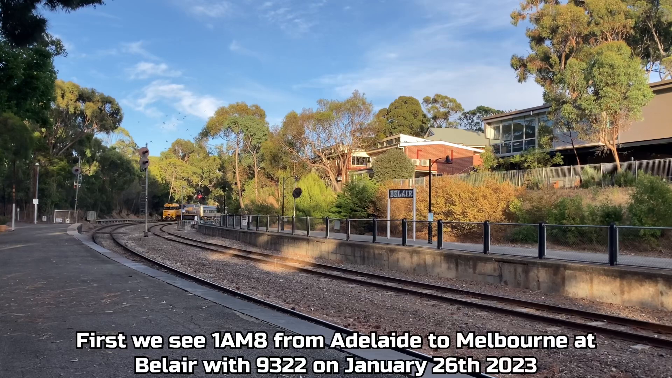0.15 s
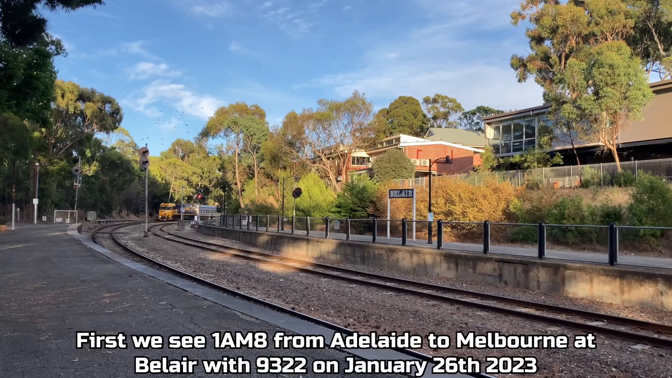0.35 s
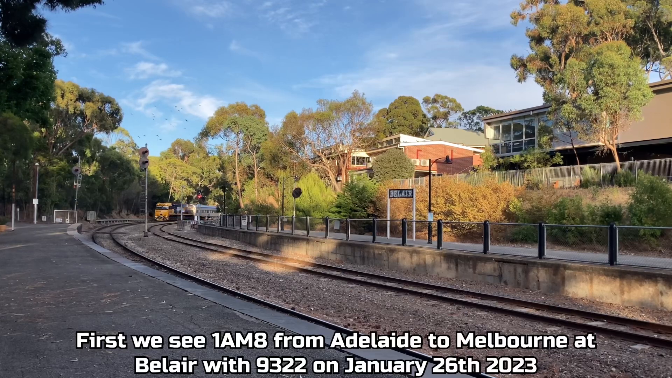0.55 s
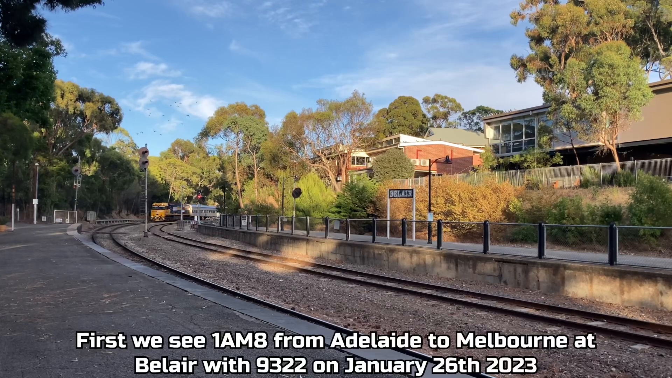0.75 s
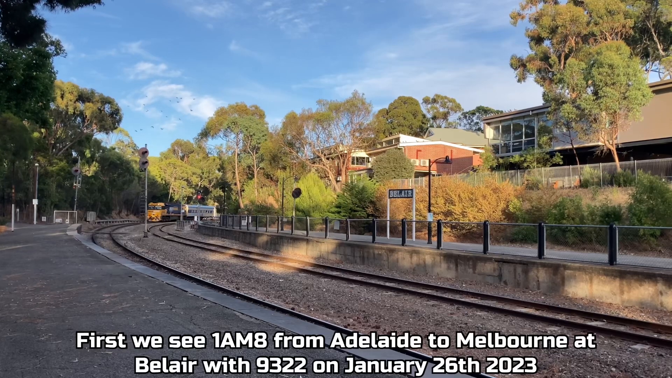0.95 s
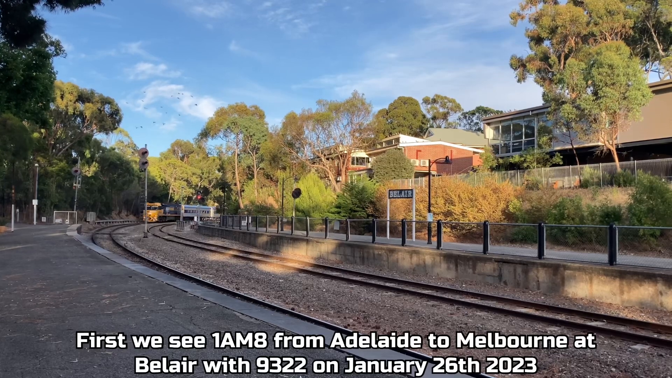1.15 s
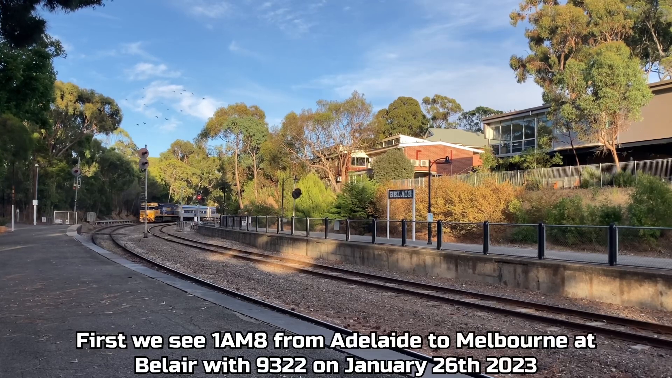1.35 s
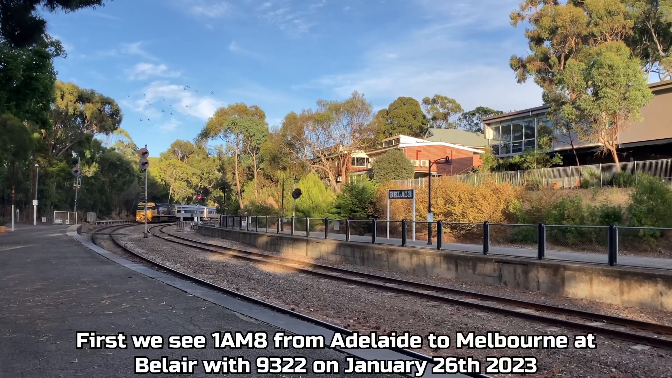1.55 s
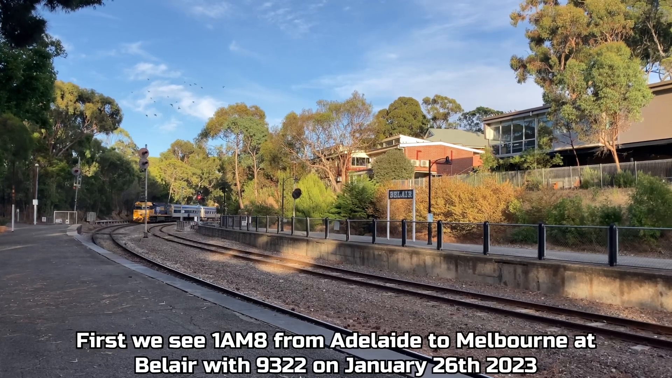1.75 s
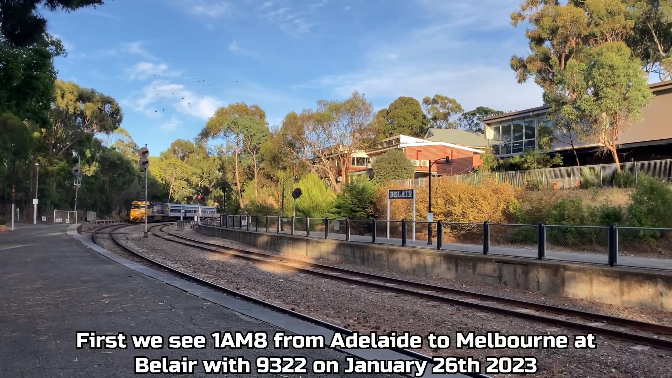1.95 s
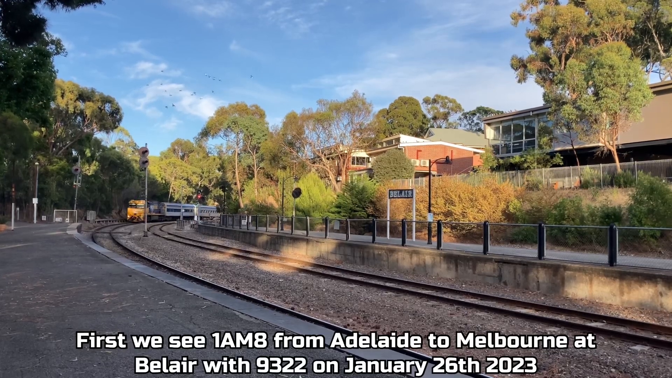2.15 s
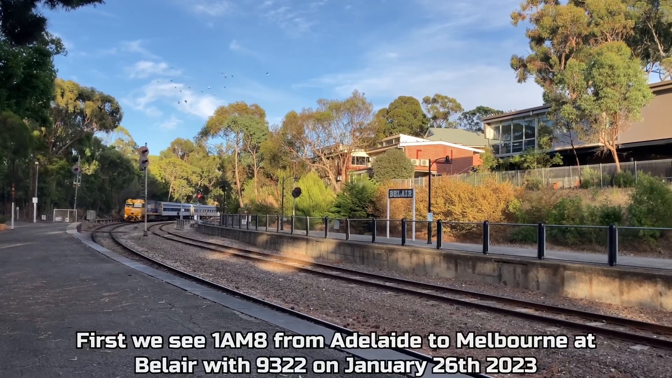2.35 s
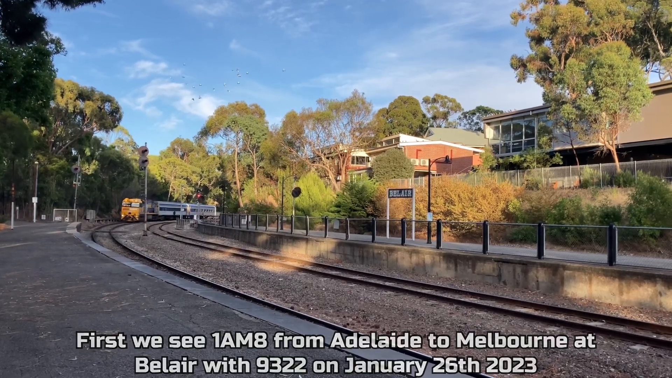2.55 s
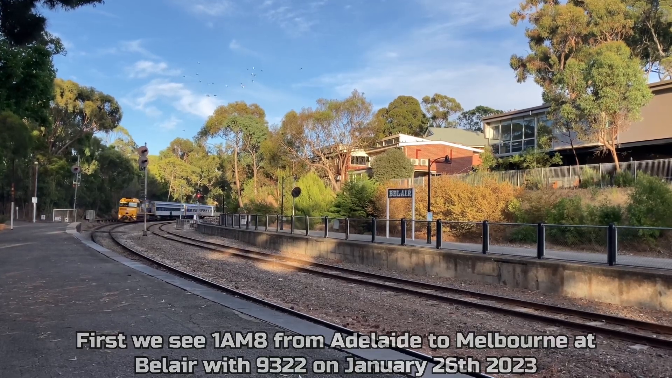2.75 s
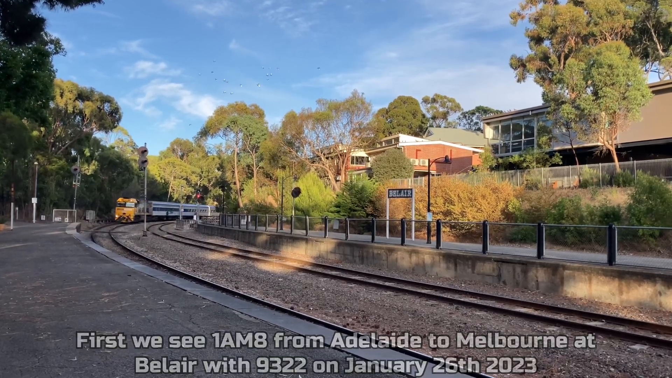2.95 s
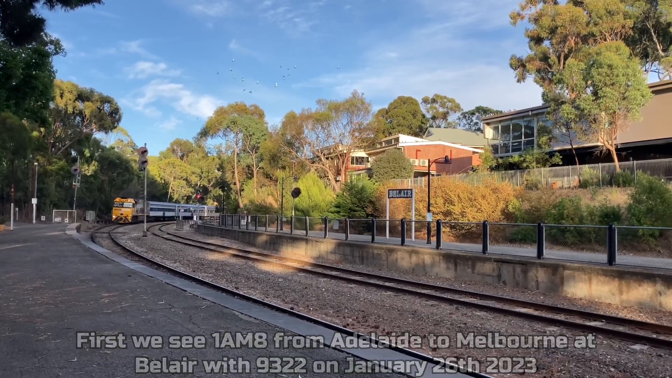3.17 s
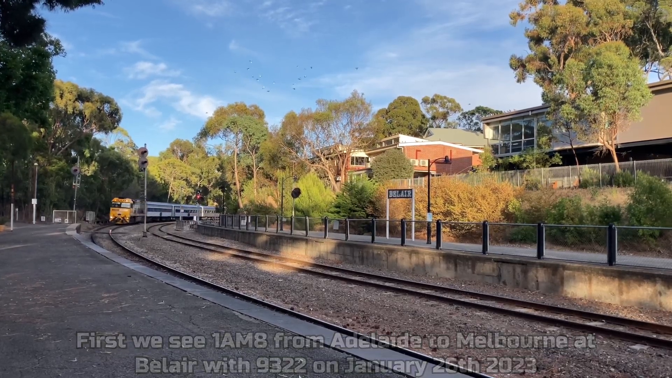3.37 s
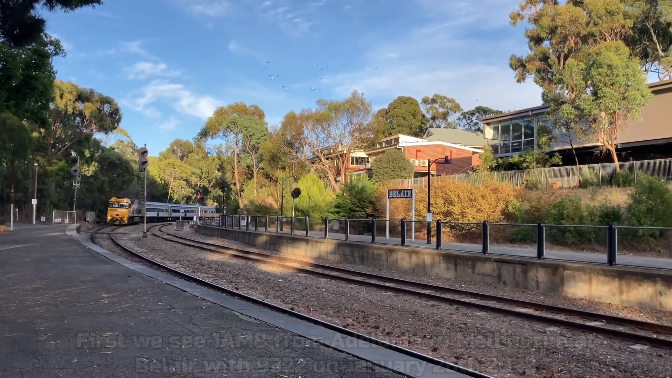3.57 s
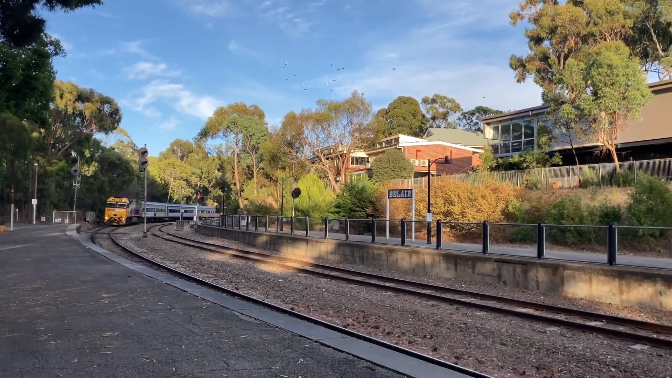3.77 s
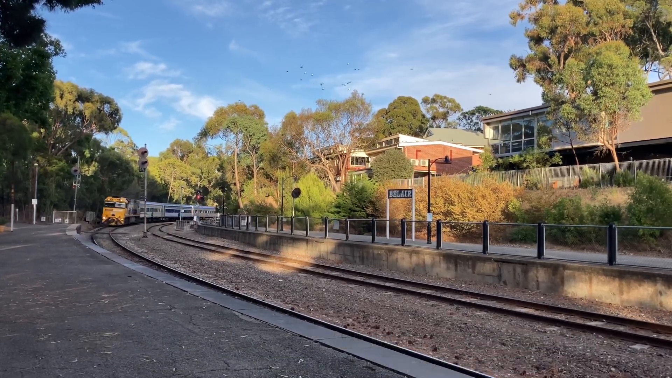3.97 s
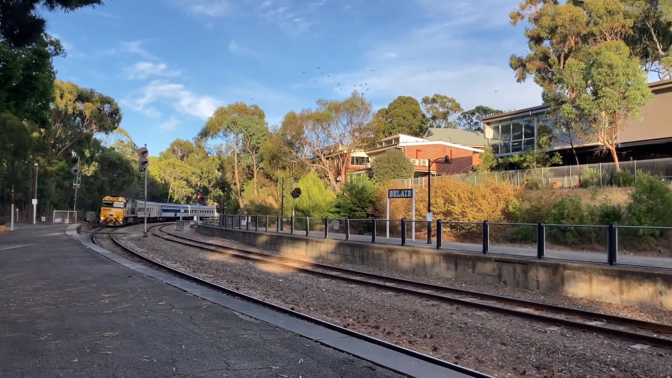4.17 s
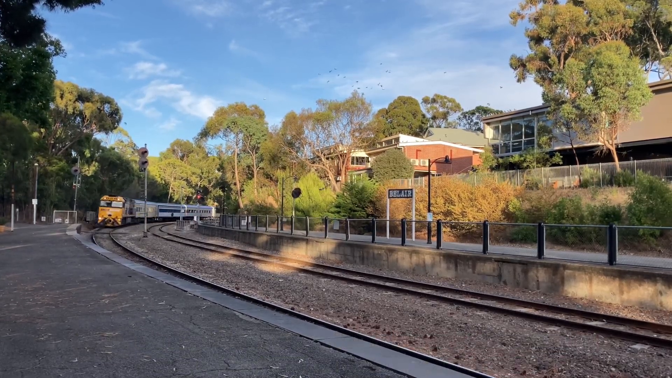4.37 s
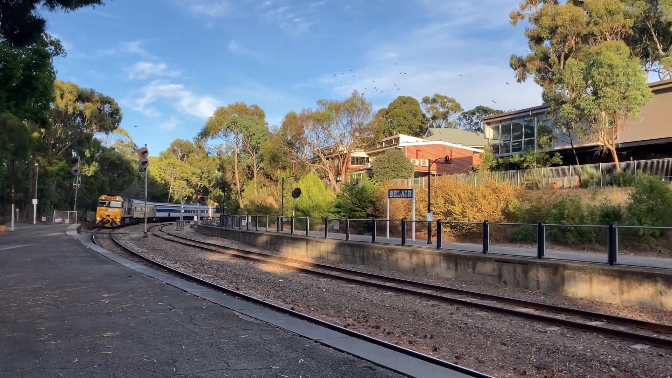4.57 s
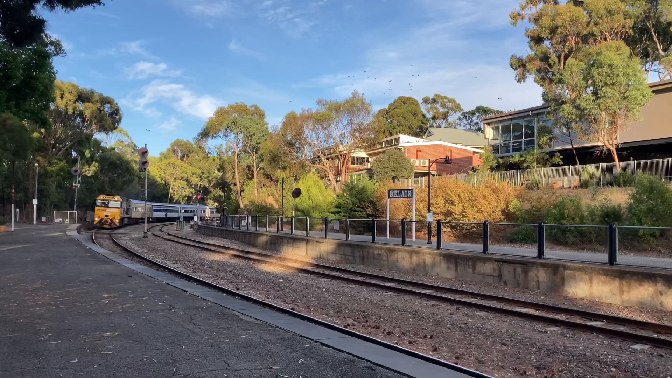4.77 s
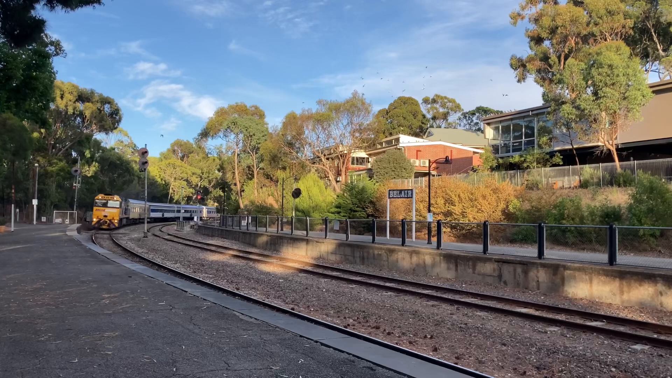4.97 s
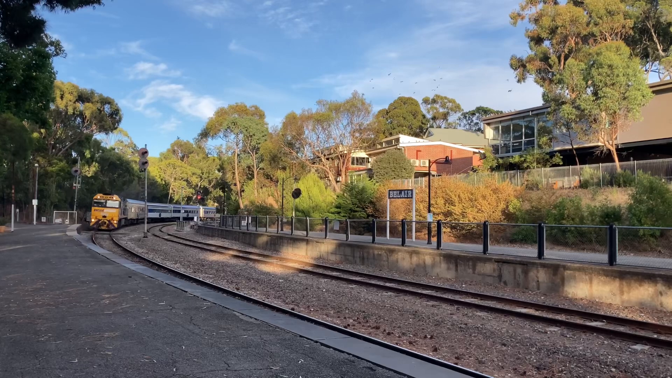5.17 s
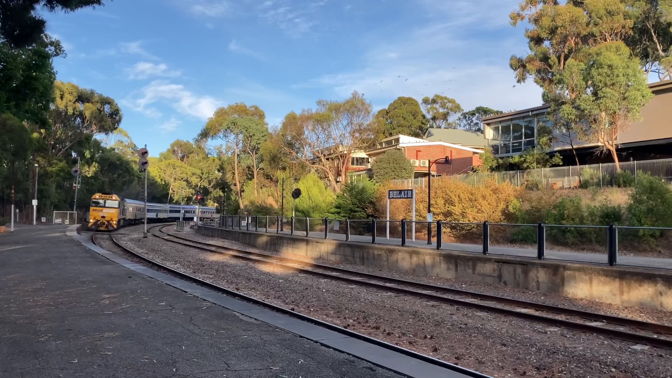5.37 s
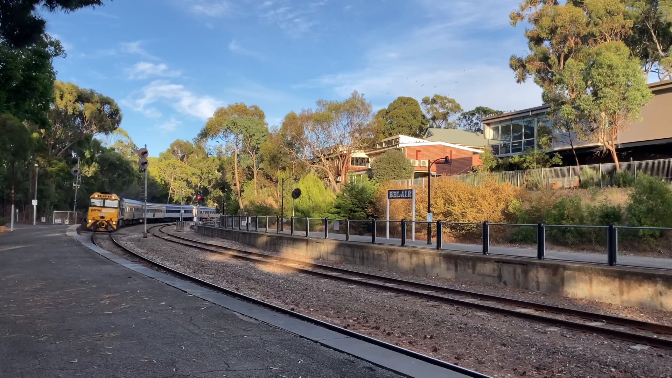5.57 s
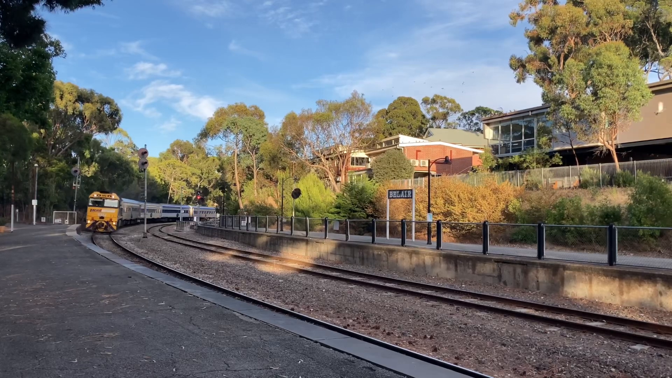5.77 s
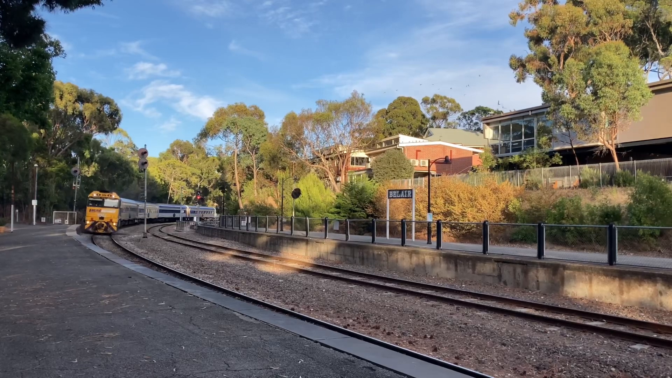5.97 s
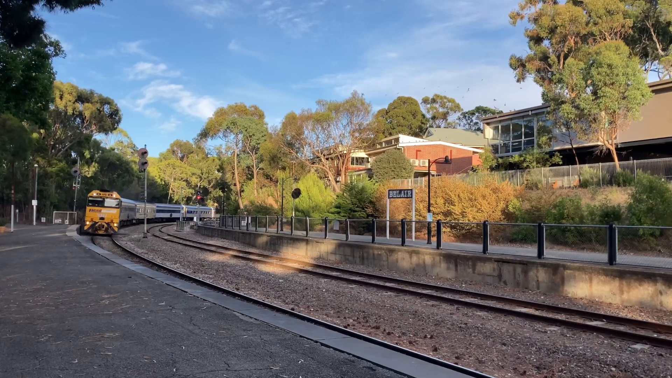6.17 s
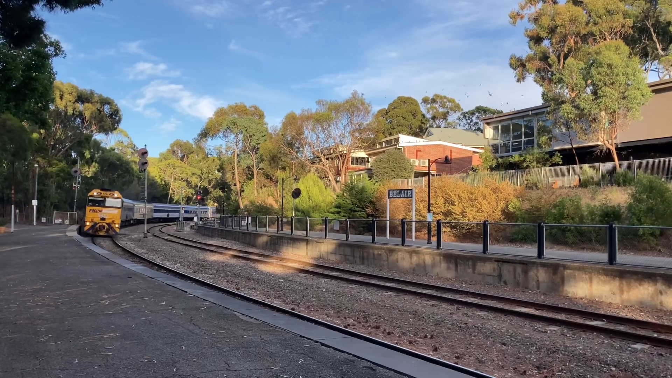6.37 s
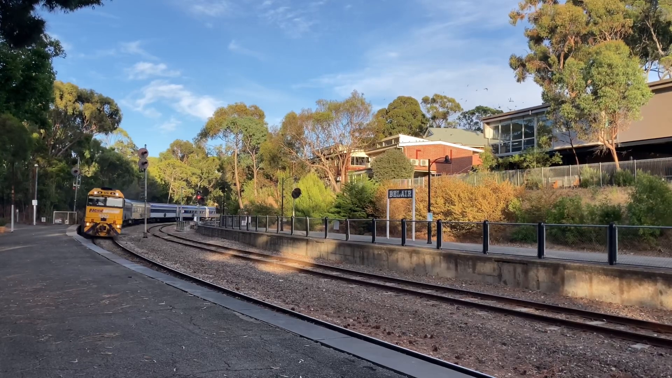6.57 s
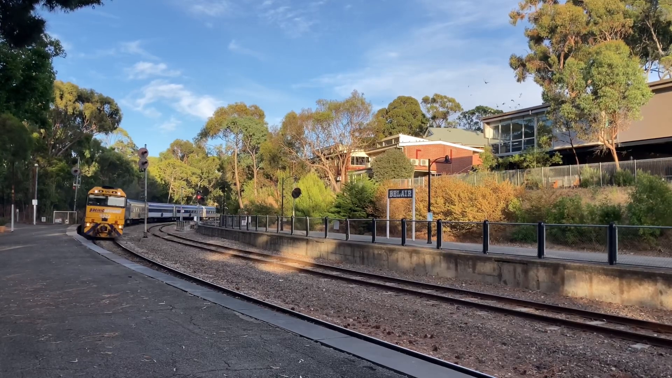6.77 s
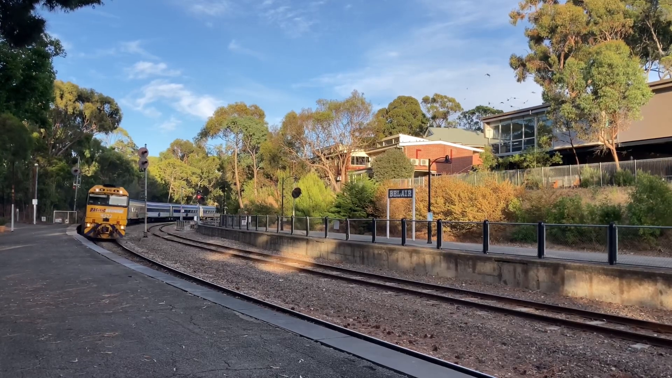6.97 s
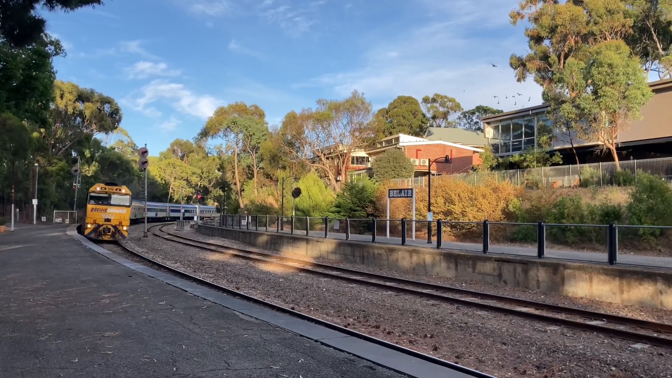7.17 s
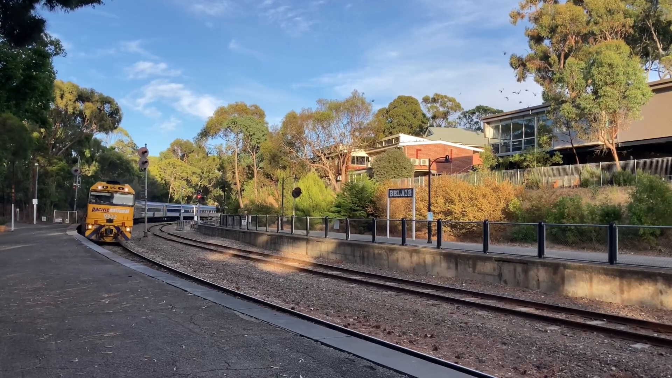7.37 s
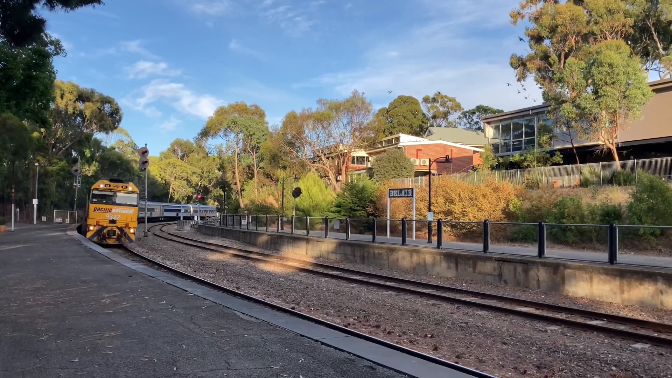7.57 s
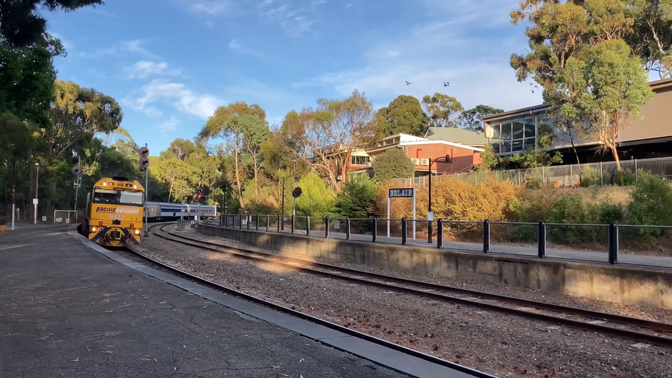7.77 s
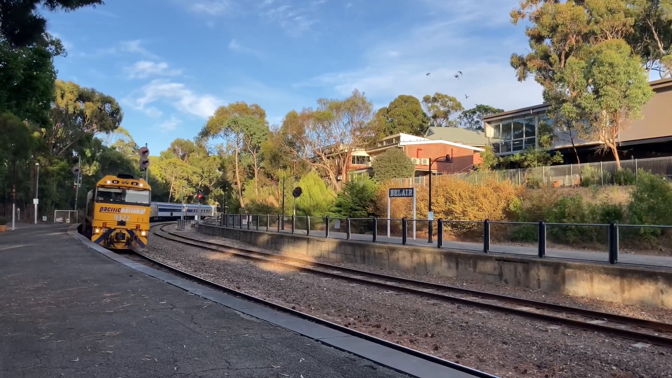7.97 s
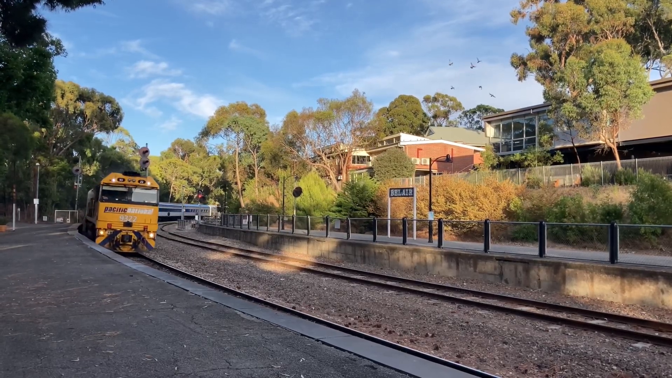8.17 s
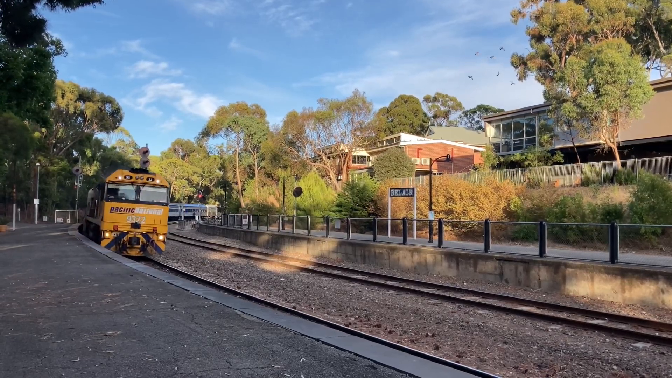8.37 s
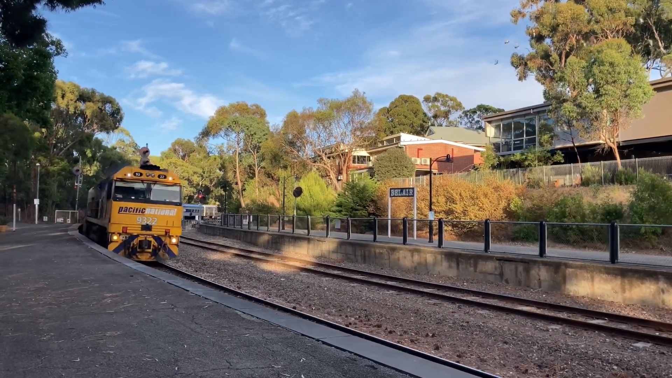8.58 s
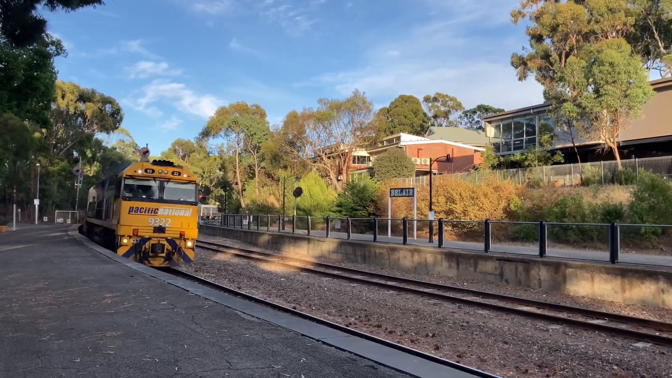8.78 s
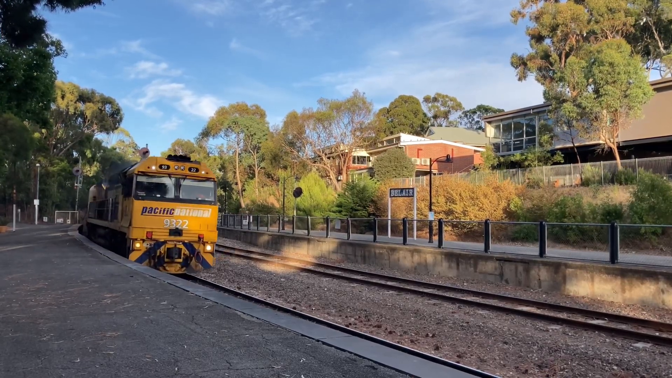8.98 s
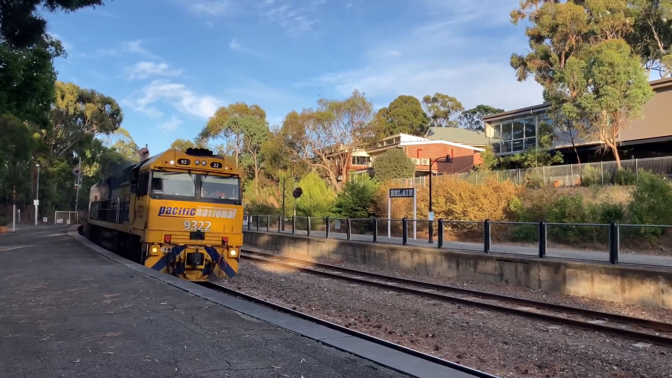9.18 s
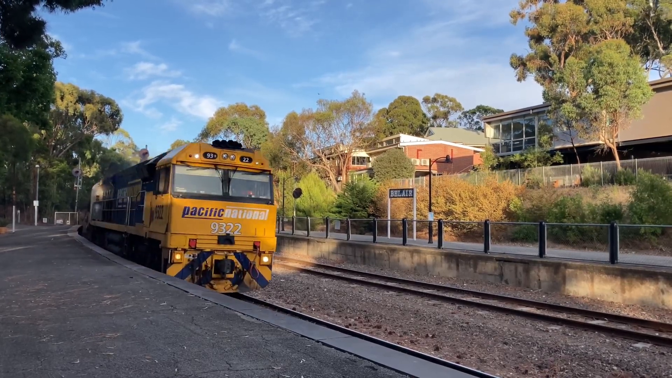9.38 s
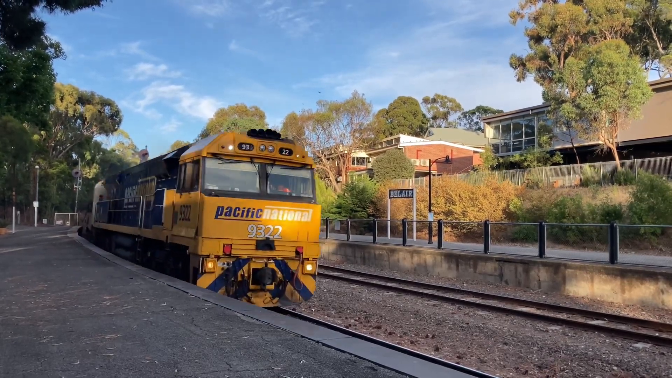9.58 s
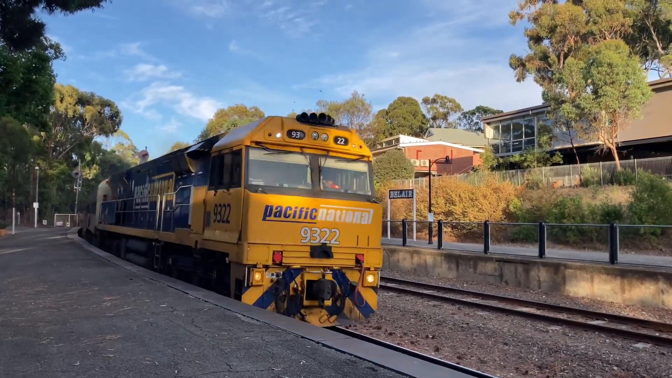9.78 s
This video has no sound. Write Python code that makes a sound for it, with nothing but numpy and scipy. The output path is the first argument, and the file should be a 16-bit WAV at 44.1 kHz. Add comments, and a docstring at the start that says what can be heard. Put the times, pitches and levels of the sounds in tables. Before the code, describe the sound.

An approaching diesel train grows from a soft rumble to a roar, flanges hissing and wheels squealing on the bend, heard from an open platform.

```python
"""A diesel locomotive draws its carriages round a curve towards a station platform.
Its exhaust throbs in noisy puffs over the steady orders of the crank, and growls wander through the rumble.
A big fan drones down in pitch as harmonics of its blade rate; the wheels rumble and roar as fluttering noise.
Flanges hiss against the curve, and squeals ring out as bands of noise and thin tones, first far off, then close by."""
import sys
import numpy as np
from scipy import signal
from scipy.fft import rfft, irfft, next_fast_len
from scipy.io import wavfile

SR = 44100
rng = np.random.default_rng(int(sys.argv[2]) if len(sys.argv) > 2 else 0)


def master(y):
    """Save y as 16-bit WAV."""
    cut = np.clip(np.atleast_2d(y).T, -1, 1)
    pcm = np.round(cut * 32767)  # scale
    wavfile.write(sys.argv[1], SR, pcm.astype(np.int16))


N = 433503
TIME = np.arange(N) / SR  # seconds
SIZE = next_fast_len(N, real=True)
BINS = np.maximum(np.fft.rfftfreq(SIZE, 1 / SR), 1)  # Hz

# Approach: a steady speed towards the point nearest the listener.
SPEED_M_PER_S, NEAREST_M, PASSES_AT_S = 15, 6, 10.54
# The locomotive comes out of the bend into the open; close by, its cab screens some of its layers.
OPEN_AT_S, OPEN_TAKES_S = 5.61, 0.12
SCREENED_AT_S, SCREENED_TAKES_S = 9.046, 0.46

# Stereo likeness of the noise washes. Each row: frequency in Hz, likeness from 0 to 1.
CHANNEL_LIKENESS = [(60, 0.97), (150, 0.96), (320, 0.91), (650, 0.56), (1100, 0.062), (1700, 0.16),
                    (2600, 0.049), (3600, 0.35), (5000, 0.12), (6200, 0.56), (6900, 1), (8000, 1),
                    (9000, 1), (10200, 1), (11400, 0.87), (12600, .75), (13600, 0.94)]
# Stereo tilt of the microphones. Each row: frequency in Hz, left minus right in dB.
CHANNEL_TILT = [(50, -3), (130, -2), (300, .2), (1200, 2), (2600, 2), (5000, 0.5), (7000, -0.5)]
# Stereo phase of the microphones. Each row: frequency in Hz, lead of the left channel in radians.
CHANNEL_LEAD = [(0, 0), (500, .65), (900, .9), (1400, 1.1), (1650, 4), (2450, 6.3), (3600, 9.4),
                (4750, 12.6), (5500, 15), (6100, 13.5), (7000, 12.6), (9050, 9.4), (11400, 6.3),
                (13400, 3.1), (14300, 2.6), (15500, 0)]
CUTOFF_HZ = 15800

# Brief flange squeaks. Each row: peak in seconds, length in seconds, mode in Hz, width in Hz,
# level in dB before the squeaks' common gain.
FLANGE_SQUEAKS = [(1.5, .16, 3580, 80, -61), (2.248, 0.27, 3160, 90, -55), (6.09, 0.13, 1980, 110, -48.5),
                  (6.13, .09, 2525, 60, -48.5), (6.64, 0.092, 3250, 1100, -41.5),
                  (7.75, 0.064, 1900, 110, -40), (6.97, 0.091, 7720, 140, -41.5),
                  (7.17, 0.18, 3080, 170, -47), (7.17, 0.19, 3900, 260, -43.5),
                  (7.264, 0.078, 3900, 170, -42), (7.62, 0.093, 7830, 69.9, -42),
                  (9.45, 0.28, 4700, 200, -33)]
# Modes of a far wheel. Each row: frequency in Hz, width in Hz, relative level in dB.
FAR_WHEEL_MODES = [(3145, 45, -21), (3810, 130, 0), (3680, 80, -9), (3920, 110, -4), (4080, 240, -10),
                   (4915, 50, -24)]
# Clearest modes of the far wheel. Each row: frequency in Hz, relative level in dB, wobble in Hz.
FAR_WHEEL_STRANDS = [(3690, -13, 25), (3800, -3.5, 26), (3885, -7, 30), (3964, 0.3, 8), (4050, -12, 30),
                     (4150, -16, 30)]
# Narrow steady tones and broader ringing bands heard during the near squeal. Each row: frequency in Hz,
# width in Hz, relative level in dB.
NEAR_SQUEAL_BANDS = [(2140, 50, -13), (2353, 40, -14), (3074, 50, -12), (3375, 60, -15), (3840, 200, -6.7),
                     (4081, 30, -11), (4700, 280, -18), (4732, 14, -10), (4785, 30, -15), (6412, 22, -7),
                     (7279, 10, 2), (7447, 50, -2), (7681, 26, 0), (8110, 90, -10), (11294, 16, -5),
                     (11930, 12, -2), (12365, 22, -9)]
# Modes of a shrill wheel. Each row: frequency in Hz, width in Hz, relative level in dB.
SHRILL_WHEEL_MODES = [(12600, 130, -9), (13250, 70, 3), (13100, 750, -13), (13700, 400, -18)]
# Modes of a thin-voiced wheel. Each row: frequency in Hz, width in Hz, relative level in dB.
THIN_WHEEL_MODES = [(7400, 95, 7), (7600, 75, -8), (8060, 130, -7)]
# Modes of a wheel that rings softly as it rolls. Each row: frequency in Hz, width in Hz, relative level in dB.
HUMMING_WHEEL_MODES = [(1960, 130, -1.5), (2110, 110, -3.5), (2530, 160, -4), (3085, 70, -7),
                       (3820, 120, -4)]
# Squeals. Each row: voice, start in seconds, attack in seconds, hold in seconds, release in seconds,
# level in dB before that voice's gain, swell while held in dB per second.
WHEEL_SQUEALS = [ ("far", 1.36, 0.08, 0.24, 0.11, -60, 3), ("far", 1.73, 0.071, 1.49, 0.42, -52.5, 5.4),
                 ("far", 1.72, .04, .08, .05, -55, 0), ("far", 2.08, .03, .06, .03, -53, 0),
                 ("far", 2.2, .02, .04, .04, -48, 0), ("far", 2.41, .015, .05, .02, -45.5, 0),
                 ("far", 2.65, .015, .03, .04, -50, 0), ("far", 2.78, .02, .05, .02, -46, 0),
                 ("far", 2.89, .015, .05, .02, -46, 0), ("far", 2.99, .02, .17, .05, -43.5, 0),
                 ("far", 3.39, .015, .02, .03, -50, 0), ("far", 3.55, .015, .02, .03, -52, 0),
                 ("humming", 5.7, .3, 2.9, .3, -50, 2.2), ("shrill", 2.7, 0.54, 3.46, .3, -54.5, 2.9),
                 ("thin", 5.77, 0.062, 0.56, 0.42, -47, 7), ("shrill", 6.66, 0.24, 0.5, .18, -35.5, .3),
                 ("thin", 7.86, 0.05, 0.1, 0.05, -42, .3), ("thin", 8.1, 0.04, 0.12, 0.06, -39, .3),
                 ("thin", 8.43, 0.05, 0.06, 0.06, -42, .3), ("thin", 9.6, 0.16, 0.094, .12, -37, .3),
                 ("near", 9.03, 0.08, .75, .3, -28.5, 4.3)]
# The singing tone of the near squeal.
SING_HZ, SING_SAG_HZ_PER_S, SING_WAVER_HZ_PER_S = 3947, 40, 30
SING_AT_S, SING_ATTACK_S, SING_DB, SING_FADE_DB_PER_S = 9.055, .05, -29.7, 5.5

# Colour of the flanges' hiss. Each row: frequency in Hz, relative level in dB per Hz.
HISS_COLOUR = [(3000, -24), (4400, -3.5), (4800, 0.5), (5250, -2), (5700, 1.5), (6200, 0.5), (6700, 5.5),
               (7050, 3), (7400, 2.5), (8150, 2.5), (8800, -33), (9700, -4), (11000, -6.5), (14000, -38)]
# Colour of the sizzle above it. Each row: frequency in Hz, relative level in dB per Hz.
SIZZLE_COLOUR = [(5000, -64), (7500, 2.5), (8800, -4), (10300, 2.5), (11800, -0.5), (12800, -1),
                 (13700, -6), (14900, -21), (17000, -26)]
# Colour of the finest sizzle. Each row: frequency in Hz, relative level in dB per Hz.
FINE_SIZZLE_COLOUR = [(11500, -35), (13500, -4), (14600, -6), (15600, 0), (17000, -3.5)]
# Roar, hiss and sizzle rise and fall in steps. Each row: start in seconds, hold in seconds,
# change of roar in dB, of hiss in dB, of both sizzles in dB.
HIGH_STEPS = [(-.05, 0.085, 2, 6, -16), (.36, 0.069, 1.5, -4.5, -6), (1.3, 0.64, 1.3, 1, 4),
              (3.0, 0.36, 0.5, 1, 1.5), (4.55, 0.52, 1.7, 3, 2), (5.66, 0.6, 1, 5, 7),
              (6.3, 0.44, -2.8, 4.5, 0), (6.9, 0.031, -1, 2.5, 11.5), (7.67, .01, 1, -0.5, 4),
              (7.99, 0.9, 0.5, 3, 4), (8.94, 0.45, 3, 5, 7), (9.15, 0.25, 3, 3, 1)]
STEP_ATTACK_S, STEP_RELEASE_S = 0.038, 0.15

# Colour of the body rumble. Each row: frequency in Hz, relative level in dB per Hz.
RUMBLE_COLOUR = [(70, -42), (120, 3.5), (165, -2.5), (215, 1.5), (255, 2.5), (300, 0.5), (335, -0.5),
                 (375, -6.5), (480, -16), (800, -13), (1600, -42.5)]
# Colour of the fan's rushing air. Each row: frequency in Hz, relative level in dB per Hz.
RUSH_COLOUR = [(250, -1.5), (420, 1), (560, 0.5), (730, 5.5), (900, -7), (1100, -2), (1250, -3), (1480, -2),
               (1700, -20), (3000, -37)]
# Colour of the rail roar. Each row: frequency in Hz, relative level in dB per Hz.
ROAR_COLOUR = [(900, -1), (1600, 2), (2100, 1.5), (2330, 0.5), (2550, 2), (2800, -1), (3150, 0.5),
               (3600, -1), (3950, -1), (4350, -8), (5000, -21), (7000, -43)]

# The fan slows. Each row: time in seconds, blade rate in Hz.
FAN_BLADE_RATE = [(0, 382.4), (2.5, 377.2), (4, 366.2), (5.3, 357.7), (6.7, 352.7), (8.3, 350.9),
                  (9.83, 343)]
# Fan harmonics. Each row: multiple of the blade rate, far level in dB, growth with nearness,
# gain in the open in dB, loss behind the cab in dB.
FAN_HARMONICS = [(2, -51, 0.79, 2.5, 6), (3, -60.5, 1.07, 3, 6.5), (4, -60.5, 1, 3.5, 4.5)]
# The harmonics swell in turn. Each row: start in seconds, hold in seconds, change of the second in dB,
# of the third in dB, of the fourth in dB.
FAN_TONE_SWELLS = [(1.1, 0.073, 5.5, 7, 4), (1.35, 0.19, 1, 8.5, 2), (1.75, 0.093, -1, 9.5, 0),
                   (2.08, 0.08, 0, 10.5, 5), (2.42, 0.24, 0, 6, 5), (2.85, 0.12, -2, 4, 2),
                   (3.25, .2, 3, -1, -1), (3.65, 0.26, 2.5, 0.5, -2), (4.15, 0.18, 1.5, 1, -13),
                   (4.5, 0.14, 1.5, -1, -10), (5.3, 0.28, 4.5, -6, -2), (6.06, 0.068, 8, -10, 2),
                   (6.35, 0.42, 0.5, 0, 5), (6.98, 0.091, 3.5, 3, -1), (7.3, 0.25, -1, 6.5, -4),
                   (7.68, 0.53, 0, 5, 0), (8.75, 1.0, 1.5, 2.5, 2.5)]
SWELL_ATTACK_S, SWELL_RELEASE_S = 0.048, 0.098
# Spread of each tone's drifting pitch, as a share of it, and of its flickering level.
FAN_WAVER, FAN_FLICKER_DB = .006, 1.0

# Growls in the rumble. Each row: start in seconds, hold in seconds, centre pitch in Hz, level in dB.
ENGINE_GROWLS = [(1.482, 0.18, 261.6, -43), (2.08, 0.61, 305, -47), (2.993, 0.063, 299.5, -40.5),
                 (3.754, 0.42, 283, -45.5), (4.75, 0.19, 289.4, -44.5), (5.717, 0.41, 299.7, -40.5),
                 (6.15, 1.2, 409, -40.5), (6.96, 0.32, 287.4, -36), (7.444, 0.44, 245, -36.5),
                 (8.197, 1.6, 345.3, -36), (9.02, 0.049, 309.4, -24.5)]
GROWL_ATTACK_S, GROWL_RELEASE_S = 0.054, 0.075
# Colour of the exhaust's boom. Each row: frequency in Hz, relative level in dB per Hz.
BOOM_COLOUR = [(12, -36), (25, -30), (33, -14), (43, 0.5), (56, -4.5), (68, -4), (90, -24), (130, -32),
               (400, -64)]
# Colour of the exhaust's throb. Each row: frequency in Hz, relative level in dB per Hz.
THROB_COLOUR = [(40, -38), (62, -0.5), (78, 4), (100, 1.5), (125, -4.5), (160, -12.5), (300, -58)]
# The low layers surge and sag. Each row: start in seconds, hold in seconds, change of engine note in dB,
# of boom in dB, of throb in dB, of rumble in dB.
ENGINE_SURGES = [(-.1, 0.39, 0, -0.5, -1.5, -1), (.7, 2.3, 1, -2, 0, 2.5), (4.75, 0.092, 8, -1, 2, -4.5),
                 (5.25, 0.25, 5, 3.5, 0, 0), (5.75, 0.098, 3.5, 2, 9.5, -2), (6.25, 0.046, 3.5, 0, 3.5, -1),
                 (6.85, 0.078, -4, 7, 5.5, 1), (7.72, 0.047, 3, -9, -2, 5.5), (8.44, 0.45, 4, -2, 1, -1.1),
                 (8.85, 0.089, -5, -6, 3, 2.5)]
SURGE_ATTACK_S, SURGE_RELEASE_S = 0.082, 0.2
CRANK_HZ = 15.4  # mean rate
# Engine orders. Each row: multiple of the crank rate, relative level in dB.
ENGINE_ORDERS = [(2.5, -14), (3.5, -10), (4, 4.5), (5.5, -10), (6.5, -8), (8, -4.5), (8.5, -13),
                 (10.5, -10), (12.5, -7.5), (14.5, -11), (16, -10), (17, -12), (19, -12)]


def from_db(db):
    """Decibels to gain."""
    return 10 ** (np.asarray(db) / 20)


def rms_one(x):
    """Scale to unit rms."""
    return x / np.sqrt(np.mean(np.abs(x) ** 2) + 1e-20)


def by_hz(points):
    """A spectrum table at every frequency bin, joined on a log axis."""
    hz, value = np.transpose(points)
    return np.interp(np.log(BINS), np.log(hz), value)


def drift(rate):
    """Slow chance of spread 1 that changes about `rate` times a second."""
    # Twice-smoothed noise, drawn at every 40th sample; the filter's first 2000 steps are dropped.
    pole = np.exp(-80 * np.pi * rate / SR)
    noise = rng.standard_normal(N // 40 + 2002)
    slow = signal.lfilter([1], [1, -2 * pole, pole * pole], noise)[2000:]
    return np.interp(np.arange(N) / 40, np.arange(len(slow)), rms_one(slow))


def ramp(start_s, length_s):
    """From 0 to 1 in a straight line."""
    return np.clip((TIME - start_s) / max(length_s, 1e-3), 0, 1)


def envelope(start_s, attack_s, hold_s, release_s):
    """Straight attack, hold at 1, exponential release."""
    released_s = np.maximum(TIME - start_s - attack_s - hold_s, 0)
    return ramp(start_s, attack_s) * np.exp(-released_s / max(release_s, 1e-3))


def lifts(events, attack_s, release_s):
    """The dB that a table of events adds to each of its layers, at every sample."""
    rows = np.array(events)
    envelopes = np.array([envelope(start, attack_s, hold, release_s) for start, hold in rows[:, :2]])
    return rows[:, 2:].T @ envelopes


def approach(far_db, growth, open_db, screened_db=0):
    """Level in dB of a source on the nearing train; growth 1 is the inverse-distance law."""
    metres = np.hypot(NEAREST_M, SPEED_M_PER_S * (PASSES_AT_S - TIME))
    nearness_db = 20 * np.log10(metres[0] / metres)
    view_db = open_db * ramp(OPEN_AT_S, OPEN_TAKES_S)
    view_db = view_db - screened_db * ramp(SCREENED_AT_S, SCREENED_TAKES_S)
    return far_db + growth * nearness_db + view_db


def stereo_noise(gain, alike):
    """Two channels of noise with the given gain and likeness per frequency; rms 1."""
    mid, side = rfft(rng.standard_normal((2, SIZE)))
    alike = np.clip(alike, -1, 1)
    pair = np.sqrt(1 + alike) * mid + np.sqrt(1 - alike) * side * [[1], [-1]]
    return rms_one(irfft(pair * gain, SIZE)[:, :N])


def wash(colour, level_db, flutter_db, flutter_rate, modes_db=0):
    """Countless contacts or eddies merge into noise whose strength flutters."""
    noise = stereo_noise(from_db(by_hz(colour) + modes_db), by_hz(CHANNEL_LIKENESS))
    return from_db(level_db + flutter_db * drift(flutter_rate)) * noise


def ringing(ripple_db, spacing_hz):
    """The many close modes of wheels and rails ripple a spectrum: dB per frequency bin."""
    heights = np.clip(rng.standard_normal(4000), -1.5, 1.5)
    return ripple_db * np.interp(BINS / spacing_hz, np.arange(len(heights)), heights)


def smeared_tone(hz, level_db, width_hz, scatter):
    """A tone smeared by turbulence and by echoes that reach each channel differently."""
    direct, left, right = (drift(width_hz) + 1j * drift(width_hz) for _ in range(3))
    smear = rms_one(direct + scatter * np.array([left, right]))
    carrier = np.exp(2j * np.pi * np.cumsum(hz) / SR)
    return np.sqrt(2) * from_db(level_db) * np.real(smear * carrier)


def squeal(bands, drive, gain_db, alike, stutter_db, stutter_rate):
    """Noise rings in narrow resonant bands, and its strength stutters unevenly."""
    power = sum(from_db(db) ** 2 / (1 + (2 * (BINS - hz) / width) ** 2) ** 2 for hz, width, db in bands)
    stutter = from_db(gain_db + stutter_db * drift(stutter_rate))
    return drive * stutter * stereo_noise(np.sqrt(power), alike)


def squeaks():
    """A flange grips for a moment and one mode swells and dies."""
    out = 0
    for peak, length, hz, width, db in FLANGE_SQUEAKS:
        drive = from_db(db) * envelope(peak - length * 2 / 3, length / 2, length / 3, length / 3)
        out = out + squeal([(hz, width, 0)], drive, gain_db=1.5, alike=0.26, stutter_db=2.0, stutter_rate=50)
    return out


def grip(voice):
    """How hard one voice is driven: each of its squeals catches, swells and dies away."""
    drive = 0
    for name, start, attack, hold, release, db, swell in WHEEL_SQUEALS:
        if name == voice:
            held_s = np.clip(TIME - start - attack, 0, hold)
            drive = drive + envelope(start, attack, hold, release) * from_db(db + swell * held_s)
    return drive


def strands(drive, level_db, width_hz):
    """The far wheel's clearest modes sing as thin tones: one holds its pitch best, the others wobble round it."""
    return drive * sum(smeared_tone(hz + wobble_hz * drift(12), level_db + db, width_hz, scatter=0.4)
                       for hz, db, wobble_hz in FAR_WHEEL_STRANDS)


def singing(lead, breakup_per_s):
    """A tone in the near squeal starts pure, then sags, wavers and slowly breaks up."""
    age_s = np.maximum(TIME - SING_AT_S, 0)
    hz = SING_HZ - SING_SAG_HZ_PER_S * age_s + SING_WAVER_HZ_PER_S * age_s * drift(15)
    scatter = breakup_per_s * age_s
    echoes = rms_one(np.array([drift(25) + 1j * drift(25) for _ in range(2)]))
    direct = np.exp(.5j * lead * np.array([[1], [-1]]))  # left leads by `lead` radians
    pair = (direct + scatter * echoes) / np.hypot(1, scatter)
    level_db = SING_DB - SING_FADE_DB_PER_S * age_s + 1.5 * drift(20)
    gain = ramp(SING_AT_S, SING_ATTACK_S) * from_db(level_db)
    return np.sqrt(2) * gain * np.real(pair * np.exp(2j * np.pi * np.cumsum(hz) / SR))


def wheels():
    """Wheels stick and slip on the curve and sing in turn; narrow steady tones join the near squeal."""
    chatter = grip("far") * from_db(1.0 * drift(30))
    far = squeal(FAR_WHEEL_MODES, chatter, gain_db=-0.5, alike=0.75, stutter_db=1.0, stutter_rate=30)
    far = far + strands(chatter, level_db=-0.5, width_hz=9.0)
    near = squeal(NEAR_SQUEAL_BANDS, grip("near"), gain_db=3.0, alike=-0.12, stutter_db=1.8, stutter_rate=13)
    near = near + singing(lead=2.2, breakup_per_s=2.2)
    shrill = squeal(SHRILL_WHEEL_MODES, grip("shrill"), gain_db=3.5, alike=0.98,
                    stutter_db=1.7, stutter_rate=16)
    thin = squeal(THIN_WHEEL_MODES, grip("thin"), gain_db=-.5, alike=.85, stutter_db=2, stutter_rate=12)
    humming = squeal(HUMMING_WHEEL_MODES, grip("humming"), gain_db=0, alike=.7,
                     stutter_db=1.5, stutter_rate=8)
    return far + near + shrill + thin + humming


def flanges(hiss_change_db, sizzle_change_db):
    """Steel against steel on the curve hisses; the finest sizzle grows fastest with nearness."""
    hiss_db = approach(far_db=-55.5, growth=1.24, open_db=-1.5) + hiss_change_db
    sizzle_db = approach(far_db=-61.0, growth=1.78, open_db=-1.5) + sizzle_change_db
    fine_db = approach(far_db=-80.5, growth=2.65, open_db=1.0, screened_db=11.0) + sizzle_change_db
    steel_db = ringing(ripple_db=3.0, spacing_hz=30.0)
    hiss = wash(HISS_COLOUR, hiss_db, flutter_db=1.1, flutter_rate=9, modes_db=steel_db)
    sizzle = wash(SIZZLE_COLOUR, sizzle_db, flutter_db=1.0, flutter_rate=20, modes_db=steel_db)
    fine = wash(FINE_SIZZLE_COLOUR, fine_db, flutter_db=-5.5, flutter_rate=12, modes_db=steel_db)
    return hiss + sizzle + fine


def rolling(rumble_change_db, roar_change_db, pulse):
    """Body rumble, pulsing with the engine, fan air and rail roar grow as the train nears."""
    rumble_db = approach(far_db=-44.5, growth=0.95, open_db=4.5, screened_db=8.5) + rumble_change_db
    rush_db = approach(far_db=-48.5, growth=1.15, open_db=0.5, screened_db=21.0)
    roar_db = approach(far_db=-53, growth=0.91, open_db=3.5) + roar_change_db
    body_db = ringing(ripple_db=2.5, spacing_hz=7.4)
    rail_db = ringing(ripple_db=2.3, spacing_hz=34)
    rumble = wash(RUMBLE_COLOUR, rumble_db, flutter_db=1.2, flutter_rate=22, modes_db=body_db)
    rush = wash(RUSH_COLOUR, rush_db, flutter_db=2.0, flutter_rate=11.5)
    roar = wash(ROAR_COLOUR, roar_db, flutter_db=1.2, flutter_rate=12, modes_db=rail_db)
    return pulse * rumble + rush + roar


def fan(width_hz, scatter):
    """Harmonics of the blade rate swell in turn, waver and break up; the higher ones scatter more."""
    blade_hz = np.interp(TIME, *np.transpose(FAN_BLADE_RATE))
    swells_db = lifts(FAN_TONE_SWELLS, SWELL_ATTACK_S, SWELL_RELEASE_S)
    out = 0
    for (multiple, *level), swell_db in zip(FAN_HARMONICS, swells_db):
        hz = round(multiple) * blade_hz * (1 + FAN_WAVER * drift(3.99))
        level_db = approach(*level) + swell_db + FAN_FLICKER_DB * drift(2.4)
        out = out + smeared_tone(hz, level_db, width_hz, scatter * multiple)
    return out


def growls():
    """The engine's rumble gathers into a hollow, wavering growl, now at one pitch, now at another."""
    out = 0
    for start, hold, hz, db in ENGINE_GROWLS:
        tone = smeared_tone(hz * (1 + .02 * drift(4.046)), db, width_hz=15.6, scatter=0.22)
        out = out + envelope(start, GROWL_ATTACK_S, hold, GROWL_RELEASE_S) * tone
    return out


def exhaust(boom_change_db, throb_change_db):
    """Gas leaves the stack in lumpy puffs: two low washes, a boom and a throb."""
    boom_db = approach(far_db=-38.0, growth=0.2, open_db=0.0, screened_db=9) + boom_change_db
    throb_db = approach(far_db=-43, growth=0.8, open_db=1.0, screened_db=6.5) + throb_change_db
    boom = wash(BOOM_COLOUR, boom_db, flutter_db=2.1, flutter_rate=11)
    throb = wash(THROB_COLOUR, throb_db, flutter_db=2.0, flutter_rate=24.0)
    return boom + throb


def crank():
    """Turns so far of the governed crankshaft, whose rate drifts only slightly."""
    return np.cumsum(CRANK_HZ * (1 + .003 * drift(2))) / SR


def firing(turns, depth):
    """Gas flow pulses four times a turn, and unequal cylinders make it lope once a turn."""
    pulses = np.cos(2 * np.pi * 4 * turns)
    lope = .5 * np.cos(2 * np.pi * turns)
    return rms_one(1 + depth * (pulses + lope))


def engine(turns, note_change_db, waver_db):
    """Unequal four-stroke cylinders give whole and half orders of the crank rate; the main note is steadiest."""
    out, top_db = 0, max(db for _, db in ENGINE_ORDERS)
    for order, db in ENGINE_ORDERS:
        phase = 2 * np.pi * (order * turns + rng.random())
        waver_share = .5 if db == top_db else 1
        out = out + from_db(db + waver_db * waver_share * drift(5.0)) * np.sin(phase)
    level_db = approach(far_db=-56.0, growth=1.23, open_db=4.0, screened_db=9.0) + note_change_db
    return np.sqrt(2) * from_db(level_db) * out


def scene():
    """The whole train: surges and sags move its low layers, lifts and dips its high ones."""
    note_db, boom_db, throb_db, rumble_db = lifts(ENGINE_SURGES, SURGE_ATTACK_S, SURGE_RELEASE_S)
    roar_db, hiss_db, sizzle_db = lifts(HIGH_STEPS, STEP_ATTACK_S, STEP_RELEASE_S)
    turns = crank()
    pulse = firing(turns, depth=.22)
    track = squeaks() + wheels() + flanges(hiss_db, sizzle_db) + rolling(rumble_db, roar_db, pulse)
    locomotive = fan(width_hz=22.0, scatter=0.42) + growls() + exhaust(boom_db, throb_db)
    locomotive = locomotive + engine(turns, note_db, waver_db=3.5)
    return track + locomotive


def record(dry):
    """The two microphone channels differ in level and phase by frequency; the top is cut steeply."""
    lead = np.interp(BINS, *np.transpose(CHANNEL_LEAD))
    phases = np.exp(.5j * lead * [[1], [-1]])
    gains = from_db(.5 * by_hz(CHANNEL_TILT) * [[1], [-1]])
    low_pass = 1 / np.sqrt(1 + (BINS / CUTOFF_HZ) ** 400)
    return irfft(rfft(dry, SIZE) * phases * gains * low_pass, SIZE)[:, :N]


dry = scene()
out = record(dry)
master(out)
```